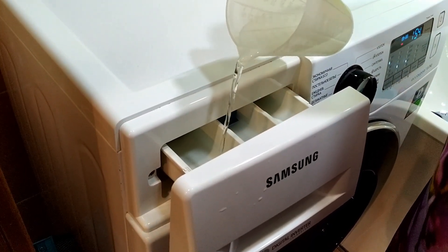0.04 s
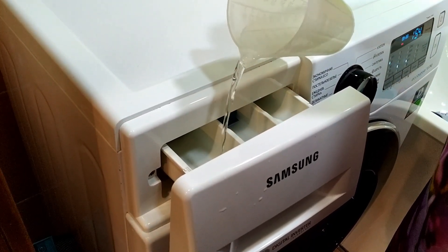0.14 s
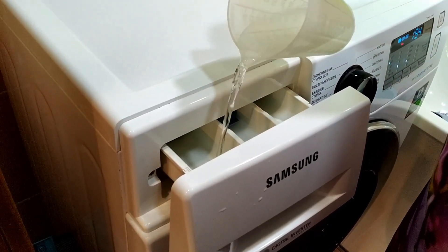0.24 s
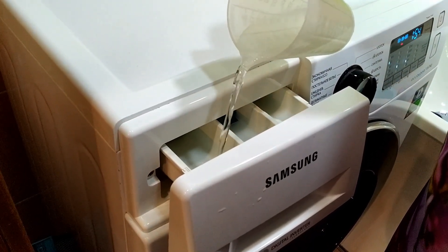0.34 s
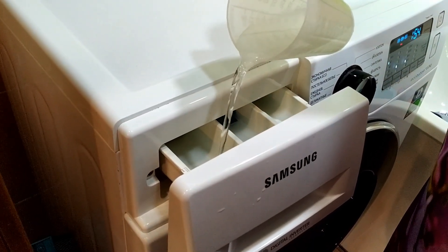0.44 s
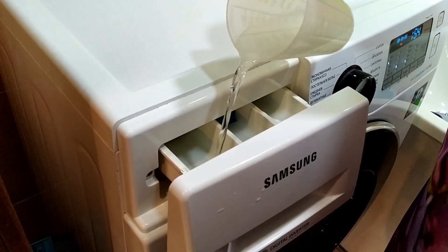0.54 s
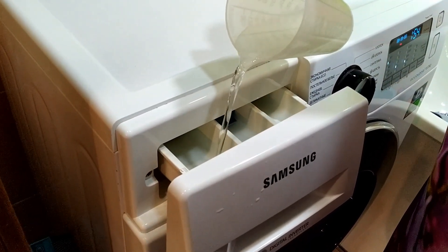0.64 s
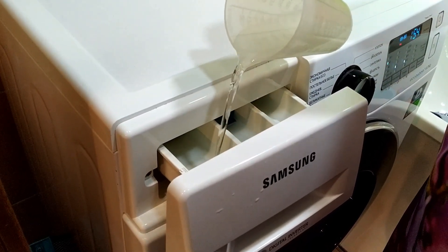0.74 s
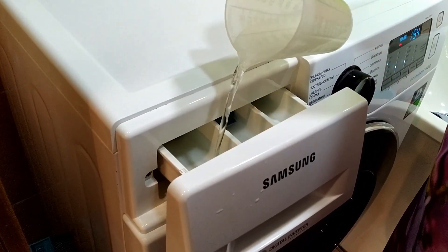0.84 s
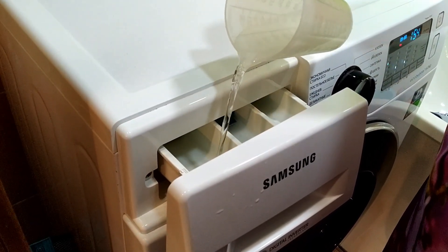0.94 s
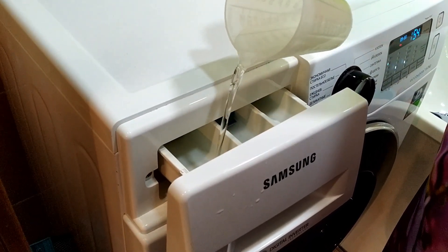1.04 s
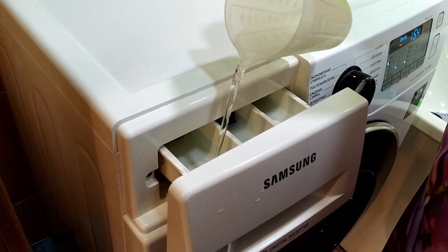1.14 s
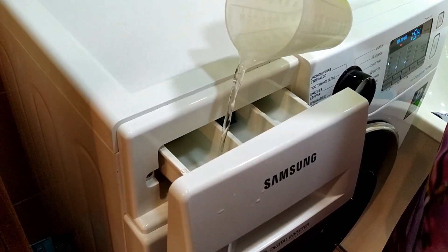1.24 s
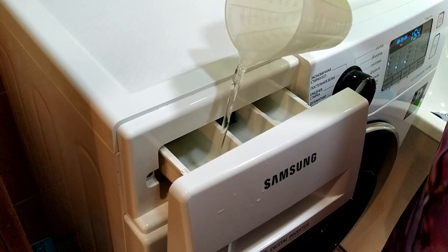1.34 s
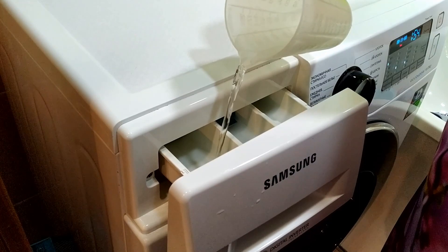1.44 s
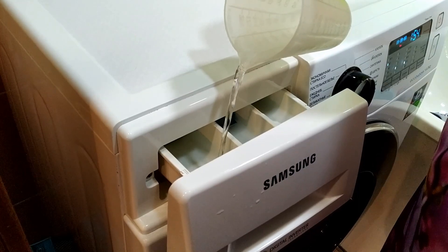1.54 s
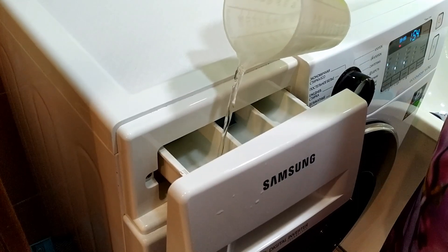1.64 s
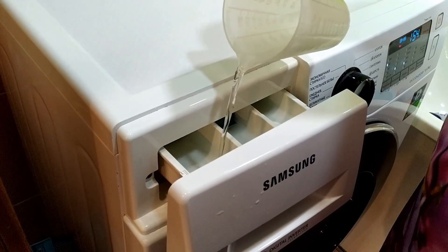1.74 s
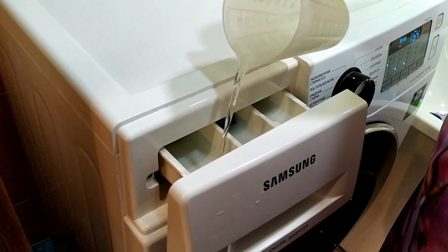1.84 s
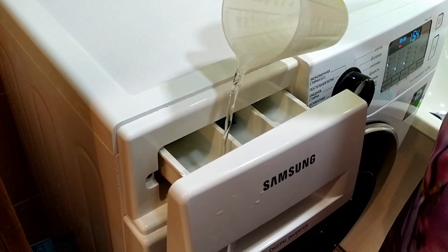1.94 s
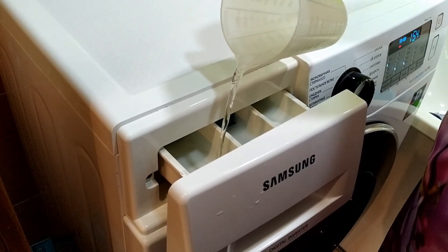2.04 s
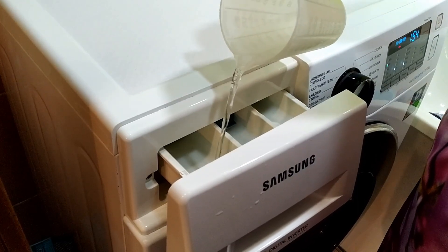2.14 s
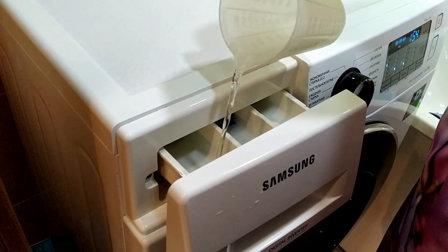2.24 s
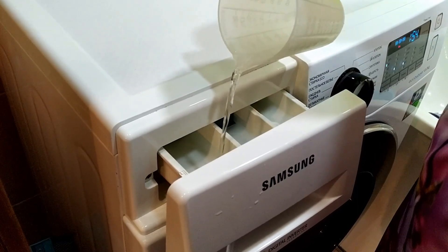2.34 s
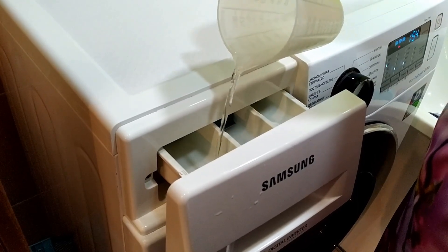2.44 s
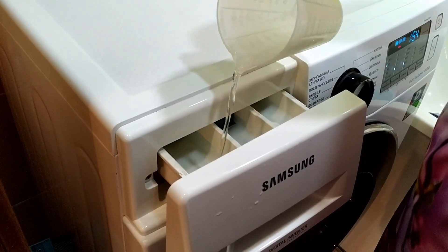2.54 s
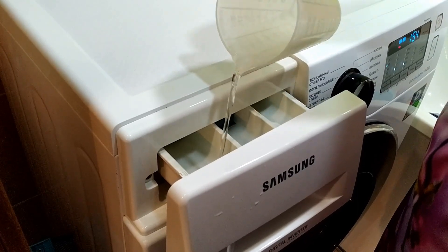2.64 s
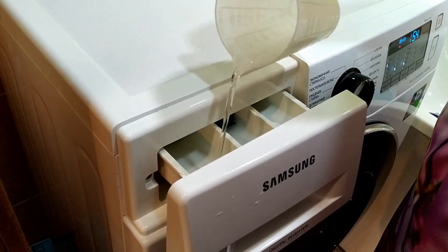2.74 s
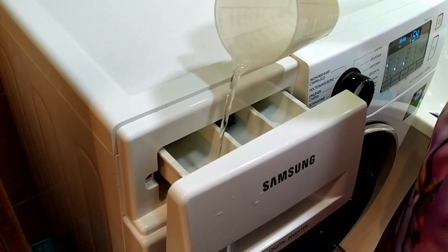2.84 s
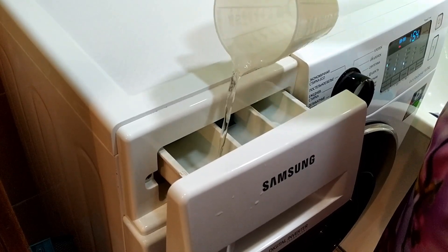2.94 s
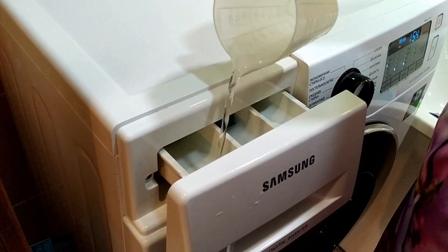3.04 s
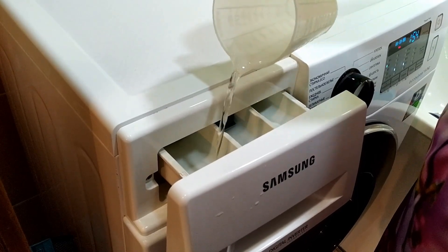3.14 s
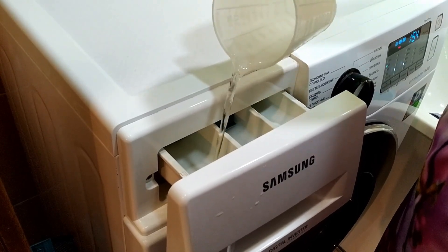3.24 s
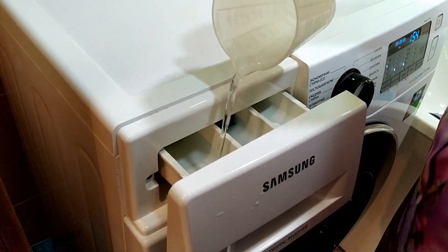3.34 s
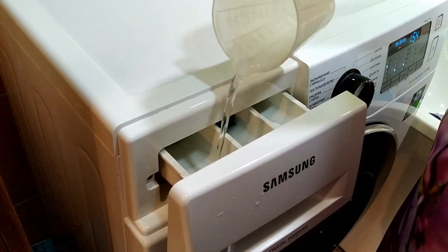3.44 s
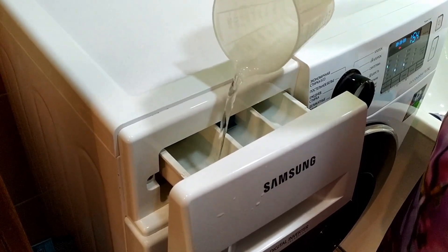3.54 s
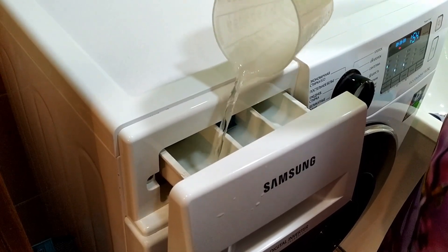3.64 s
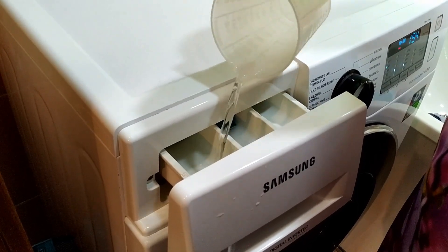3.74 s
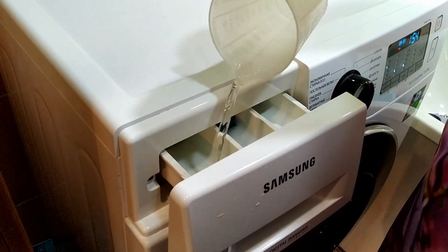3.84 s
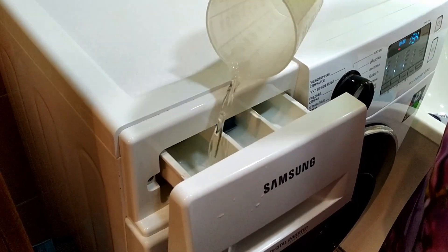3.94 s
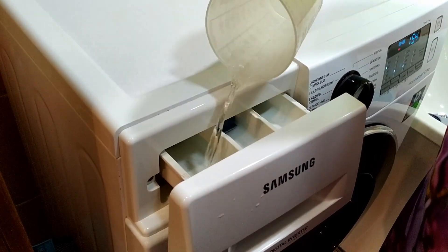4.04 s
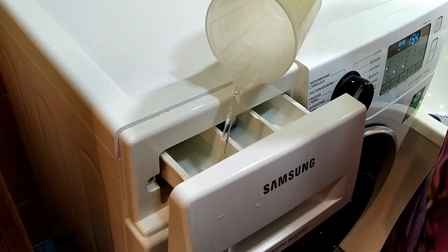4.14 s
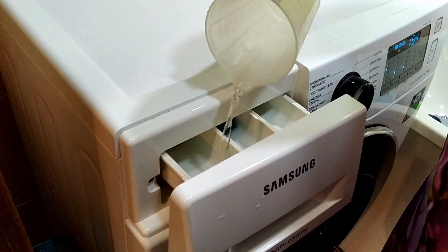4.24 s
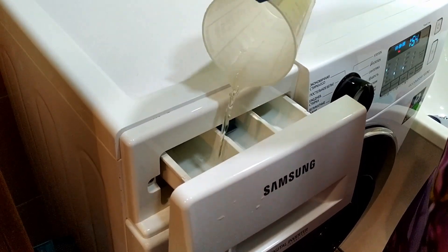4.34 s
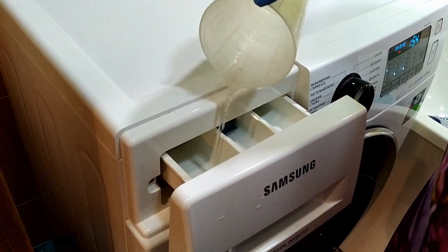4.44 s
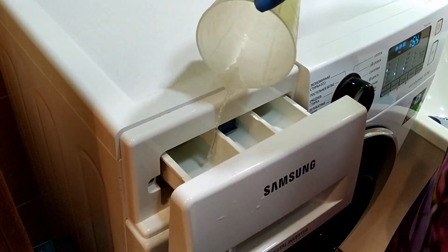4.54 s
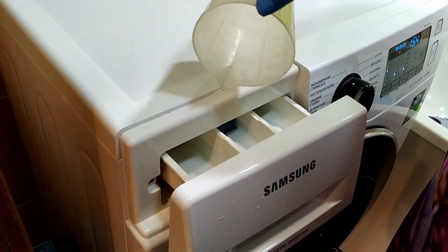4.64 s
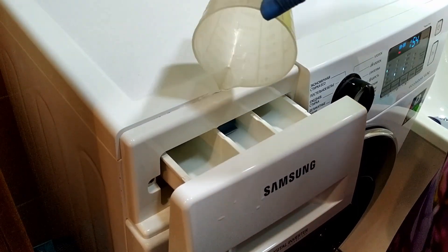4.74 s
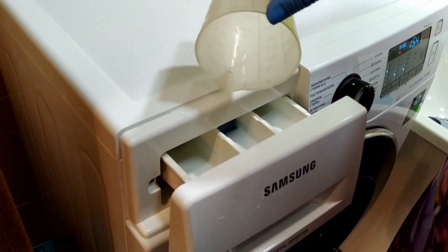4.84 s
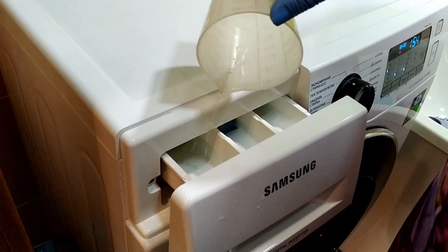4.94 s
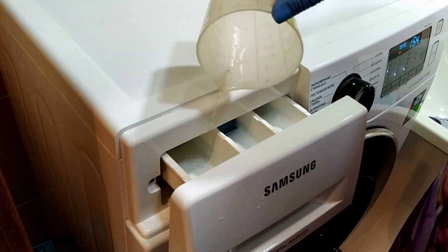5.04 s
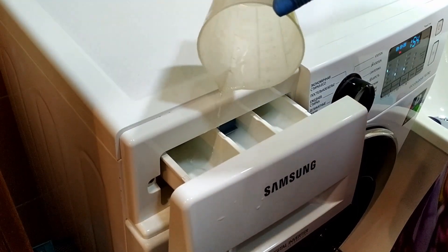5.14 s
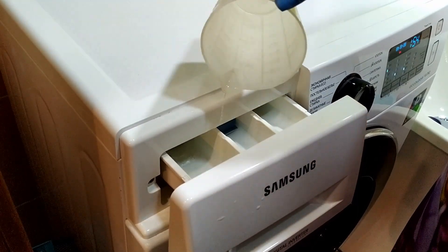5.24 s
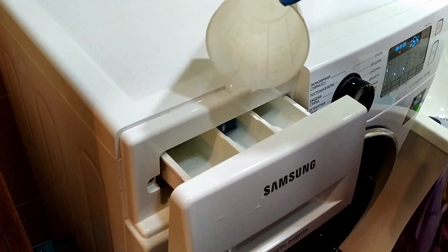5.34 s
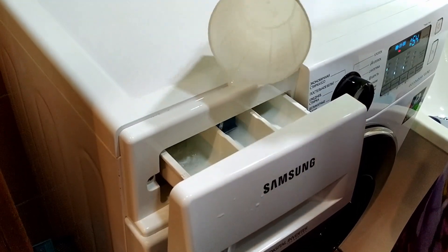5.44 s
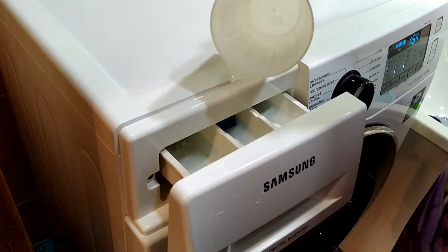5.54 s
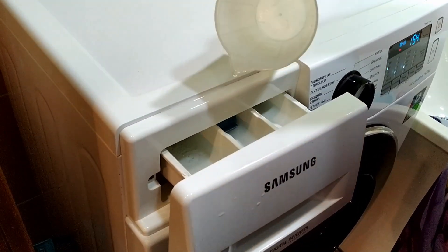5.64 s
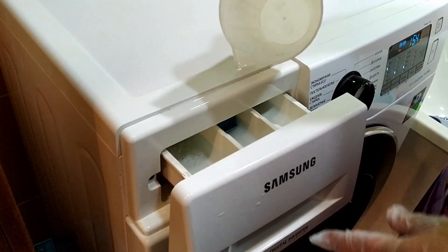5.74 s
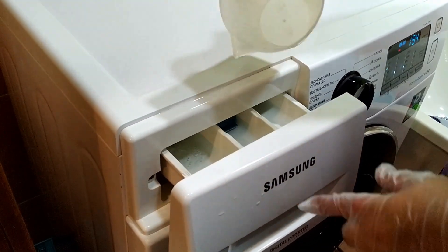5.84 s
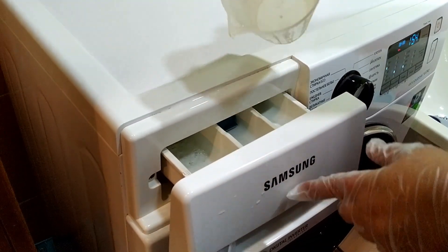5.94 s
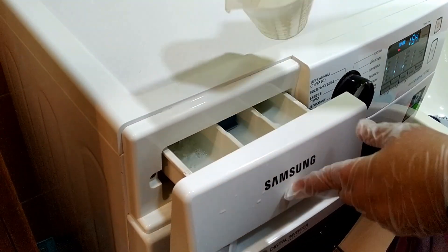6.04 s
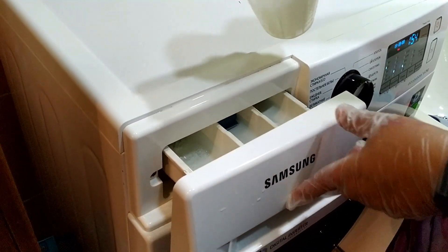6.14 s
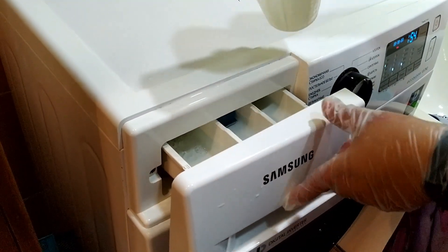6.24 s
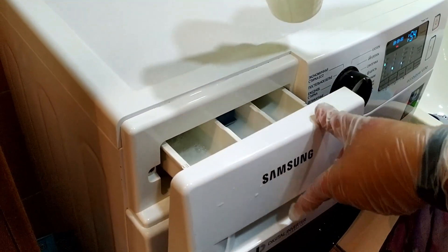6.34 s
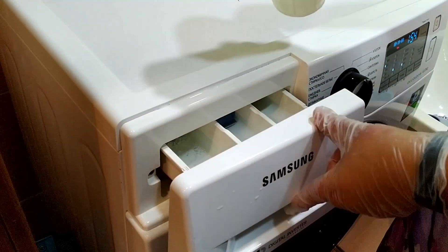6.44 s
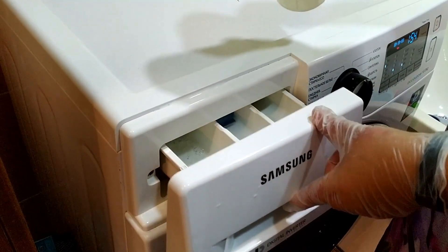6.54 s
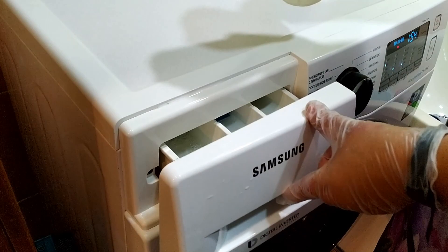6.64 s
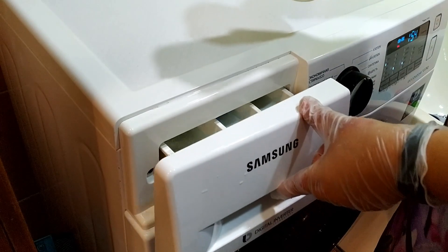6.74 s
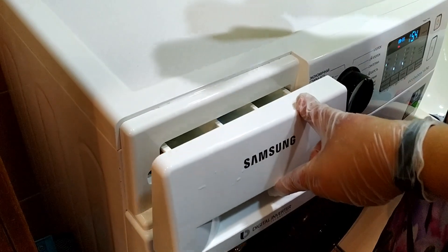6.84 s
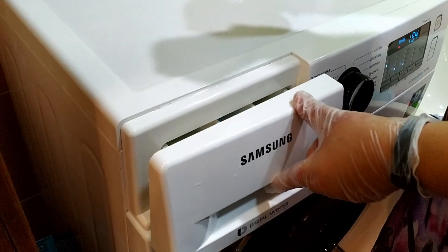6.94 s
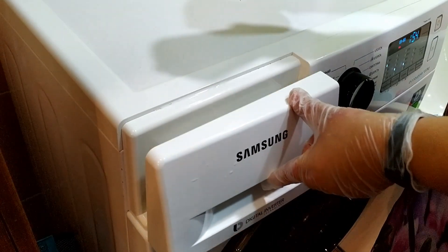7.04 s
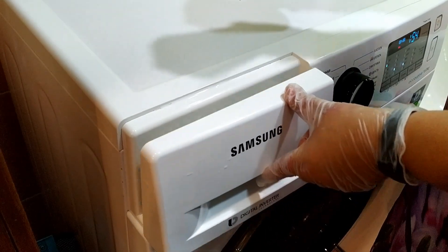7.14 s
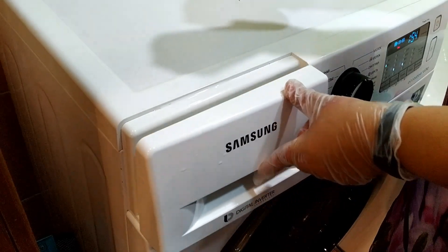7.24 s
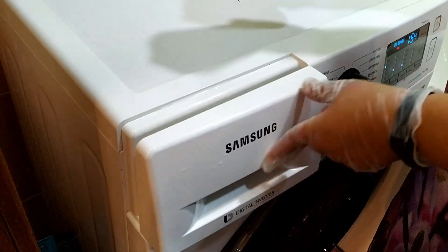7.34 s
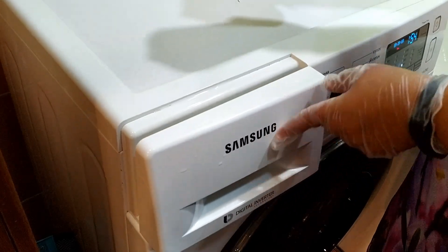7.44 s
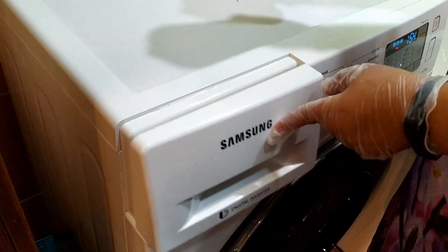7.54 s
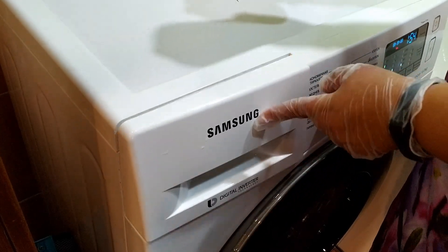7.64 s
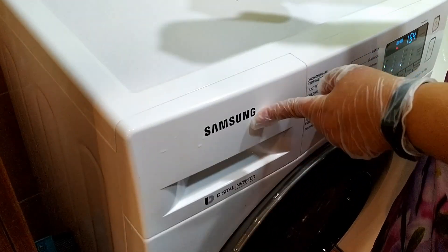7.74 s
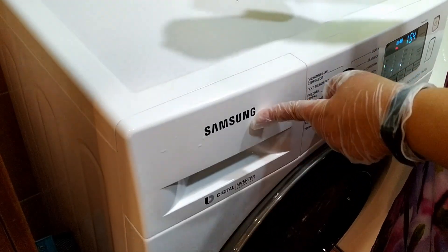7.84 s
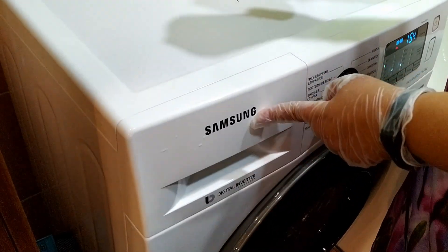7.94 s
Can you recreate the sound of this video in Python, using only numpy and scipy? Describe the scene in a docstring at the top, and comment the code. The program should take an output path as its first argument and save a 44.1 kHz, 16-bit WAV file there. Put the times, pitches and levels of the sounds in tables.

```python
"""Trickle into a detergent drawer

Liquid trickles from a jug into a washing machine's plastic drawer, in a small hard room with mains hum.
Bursting drops and bubbles are damped tones; after a bump, noise and dense grains drive the drawer's
resonances as a gritty rush. The drawer is then pushed home: thud, rattle and the snap of its catch ring
modes of cabinet and front plate. Two close ports hear it with unlike phase and colour.
"""
import sys
import numpy as np
from scipy import signal
from scipy.fft import rfft, irfft, next_fast_len
from scipy.io import wavfile
from scipy.ndimage import uniform_filter1d, map_coordinates

SR = 44100
rng = np.random.default_rng(int(sys.argv[2]) if len(sys.argv) > 2 else 0)


def wrap_up_sound(samples):
    """Save the sound to the file named by the first command line argument, as 16-bit audio."""
    columns = np.atleast_2d(samples).T
    # keep every value between -1 and 1, then stretch to whole-number steps
    tamed = np.clip(columns, -1, 1)
    steps = np.round(tamed * 32767).astype(np.int16)
    wavfile.write(sys.argv[1], SR, steps)


N = 352799
TIME = np.arange(N) / SR  # s


def amp(db):
    """Decibel law: the gain is 10 to the power dB / 20."""
    return np.exp(np.asarray(db) * (np.log(10) / 20))


def unit(x):
    """Normalisation: the signal scaled to rms 1."""
    return x / np.sqrt(np.mean(x ** 2) + 1e-20)


def along(points, hz):
    """Log-frequency interpolation of (f/Hz, value) points."""
    f, v = np.transpose(points)
    return np.interp(np.log(hz + 1), np.log(f + 1), v)


def curves(rows):
    """Linear interpolation in time: one envelope for each column after t/s."""
    s, *columns = np.transpose(rows)
    return [np.interp(TIME, s, column) for column in columns]


def wobble(rate):
    """Slow random modulation: a smooth curve through `rate` random knots a second."""
    coarse = np.arange(0, N + 32, 32)
    knots = rng.standard_normal(int(N * rate / SR) + 4)
    smooth = map_coordinates(knots, [coarse * rate / SR])
    return np.interp(np.arange(N), coarse, smooth)


def filtered(x, response):
    """Linear filtering: the spectrum times a complex frequency response."""
    m = next_fast_len(x.shape[-1] + SR // 4)
    spectrum = rfft(x, m) * response(np.fft.rfftfreq(m, 1 / SR))
    return irfft(spectrum, m)[..., :x.shape[-1]]


def shaped(x, points):
    """Spectral shaping by a (f/Hz, level/dB) curve."""
    return filtered(x, lambda hz: amp(along(points, hz)))


def resonances(modes):
    """Forced resonance: summed band-pass responses of alternating sign, from (f/Hz, width/Hz, level/dB)."""
    def response(f):
        total = 0
        for k, (centre, width, db) in enumerate(modes):
            damping = 1j * f * width
            total = total + (-1) ** k * amp(db) * damping / (centre * centre - f * f + damping)
        return total
    return response


def patchy(patchy_db, channels):
    """Non-stationary noise: white noise with patches of random gain in time and frequency."""
    z = signal.stft(rng.standard_normal((channels, N + 512)), nperseg=256)[2]
    field = rng.standard_normal(z.shape[1:])
    for axis in (0, 1):
        field = uniform_filter1d(field, size=5, axis=axis)
    return signal.istft(z * amp(patchy_db * unit(field)), nperseg=256)[1][:, :N]


def pings(s, db, hz, t60, rise=0., noisy=0., size=2048):
    """Damped oscillation: decaying tones; `rise` lifts their pitch, `noisy` lets their phase drift randomly."""
    t = np.arange(size) / SR
    s, db, hz, t60 = (np.reshape(v, (-1, 1)) for v in (s, db, hz, t60))
    jitter = noisy * np.cumsum(rng.standard_normal((len(s), size)), axis=1) if noisy else 0
    decay = amp(db - 60 * t / t60)
    onset = 1 - np.exp(-.3 * t * hz)
    wave = decay * onset * np.sin(2 * np.pi * hz * (t + rise * t * t / t60) + jitter)
    at = (s * SR).astype(int) + np.arange(size)
    return np.bincount(at.ravel(), wave.ravel(), N + SR)[:N]


def swarm(count, start, stop, centre_hz, spread, cycles, size_db):
    """Random superposition: short grains of log-normal pitch, a few much louder; rms 1 while they last."""
    u, z = rng.random((count, 2)), rng.standard_normal(count)
    hz = np.clip(centre_hz * np.exp(spread * z), 900, 13000)
    s = start + u[:, 0] * (stop - start)
    db = -size_db * np.log(u[:, 1] + 0.00057)
    grains = pings(s, db, hz, cycles / hz, rise=0.15, size=640)
    return unit(grains) * np.sqrt((stop - start) * SR / N)


# Bursting drops: t/s, level/dB, f/Hz
DROPS = [(0.554, -40.5, 9800), (0.99, -39, 6460), (1.298, -42.5, 11000), (1.3586, -38, 9750),
         (1.4207, -44.5, 5420), (1.4795, -46, 8300), (1.848, -43, 8130), (1.888, -45, 4860),
         (2.0422, -45, 6170), (2.2383, -39, 9700), (2.4279, -43, 9750), (2.6853, -43, 8040),
         (3.1178, -37, 8300), (3.4104, -38, 9700), (3.5478, -42, 10000), (3.7958, -49, 9960),
         (3.907, -34, 7700), (3.9878, -37, 11700), (4.0223, -41.5, 12060), (4.0825, -31.5, 10080),
         (4.1205, -48, 8300), (4.1474, -35.5, 12900), (4.208, -43, 8370), (4.2433, -42, 7060),
         (4.322, -40, 11600), (4.344, -37, 8260), (4.485, -43, 10500), (4.5291, -42, 7360),
         (4.6009, -49, 10000), (4.7705, -41.5, 11030), (4.9215, -33.5, 8820), (4.9631, -36, 9650)]
# Ringing air bubbles: t/s, level/dB, f/Hz
AIR_BUBBLES = [(0.0792, -45, 2580), (1.4212, -50, 2500), (1.4416, -48, 2160), (1.481, -51, 1480),
               (1.7544, -52.5, 2800), (1.8881, -52, 2520), (1.9744, -54, 2400), (2.187, -53, 1710),
               (2.2374, -44.5, 1680), (2.3196, -49, 1400), (2.365, -55, 2070), (2.4279, -45, 1390),
               (2.6838, -50, 1640), (2.813, -50, 1420), (2.977, -51, 1690), (3.1168, -43.5, 1644),
               (3.249, -42, 1720), (3.4092, -54, 1730), (3.5468, -55, 2130), (3.7944, -57, 1710),
               (3.8178, -45.5, 2560), (3.9115, -48, 3500), (3.9309, -42, 1580), (3.9893, -53, 2660),
               (4.0228, -49, 3260), (4.0652, -56, 2070), (4.0901, -47, 2280), (4.118, -48, 2370),
               (4.1774, -42, 1900), (4.238, -49, 2360), (4.27, -41.5, 1785), (4.36, -40, 1784),
               (4.4415, -46, 2920), (4.5338, -50, 1240), (4.56, -43.5, 1630), (4.6009, -48, 1720),
               (4.639, -46, 2890), (4.686, -41, 1395), (4.7204, -44, 2210), (4.7731, -43.5, 2070)]
# Sheets of spray: t/s, level/dB, 1/e length/s
SPRAY_SHEETS = [(1.418, -62, .04), (2.232, -57, 0.026), (2.415, -59, .04), (3.258, -61, 0.23),
                (3.402, -59.5, 0.02), (3.541, -49.5, 0.089), (3.905, -50.5, 0.016), (4.117, -52, 0.04),
                (4.246, -55, 0.11), (4.333, -57, 0.051), (4.439, -56.5, 0.049), (4.524, -57, 0.064),
                (4.593, -52.5, 0.1)]
# Relative spectrum of the sheets: f/Hz, level/dB
SHEET_SPECTRUM = [(590, -48), (1000, -21), (1700, -25), (2070, -4), (4120, -7), (4890, -5.5), (10100, 1),
                  (14000, -20), (15000, -37)]
# Faint patter of many small bubbles: t/s, level/dB
PATTER_LEVEL = [(0, -84), (1.9, -77), (2.3, -67.5), (2.9, -72), (3.3, -67), (4.0, -73.5), (4.2, -69),
                (4.6, -65.5), (4.9, -67.5)]
DROP_T60_S, SPIT_T60_S, SPIT_DB = 0.034, 0.0084, -13  # spit level relative to its drop
BUBBLE_T60_S, SNAP_T60_S = 0.036, 0.0074


def trickle():
    """Volume resonance of trapped air: bubbles ring as damped tones, among spitting drops and sheets of spray."""
    s, db, hz = np.transpose(DROPS)
    drops = pings(s, db, hz, DROP_T60_S, noisy=0.23)
    drops += pings(s, db + SPIT_DB, 0.99 * hz, SPIT_T60_S, noisy=0.93)

    s, db, hz = np.transpose(AIR_BUBBLES)
    bubbles = pings(s, db, hz, BUBBLE_T60_S, rise=0.04, noisy=0.15)
    bubbles += pings(s, db, 2 * hz, SNAP_T60_S, noisy=0.84, size=512)  # opening snap, an octave up

    sheets = 0
    for s, db, length in SPRAY_SHEETS:
        onset = np.clip((TIME - s) / 0.0023, 0, 1)
        sheets = sheets + amp(db) * onset * np.exp(-((TIME - s) / length) ** 2)
    spray = sheets * unit(shaped(patchy(3, channels=1)[0], SHEET_SPECTRUM))

    stop = PATTER_LEVEL[-1][0]
    patter = amp(curves(PATTER_LEVEL)[0]) * swarm(
        count=1200, start=0, stop=stop, centre_hz=1677, spread=0.334, cycles=19, size_db=3.5)
    spits = amp(-73.5) * swarm(
        count=600, start=0, stop=stop, centre_hz=8100, spread=0.227, cycles=40, size_db=0.5)
    return drops + bubbles + spray + patter + spits


# Course of the rush: t/s, level/dB, floor level/dB and walls level/dB relative to the fizz
RUSH_COURSE = [(4.93, -64, -3, -4), (4.97, -44, -31, -21), (5.01, -41, -2.5, -12), (5.08, -39.5, -19, -10),
               (5.19, -38, -4, -10), (5.53, -39, -11.5, -12.5), (5.59, -40, -2.5, -9),
               (5.78, -38, -22.5, -15.5), (6.62, -39, -10.5, -12), (7.25, -41.5, -21, -6.5),
               (7.39, -45, -6, -4.5), (7.52, -41, -15, -7.5), (7.64, -46, -22, -6)]
# Relative spectrum of its bright fizz: f/Hz, level/dB
FIZZ_SPECTRUM = [(590, -45), (1000, -9.5), (1400, -5.5), (2090, -7.5), (3040, -7.5), (3520, -9.5),
                 (3980, -3), (5230, -9.5), (5900, -9.5), (6500, -4), (7200, -5.5), (8200, -3), (9860, 0.5),
                 (11000, -5.5), (14200, -13), (14500, -75)]
# Resonances of spout, walls, floor and rails, one list each: f/Hz, width/Hz, relative level/dB
DRAWER_PARTS = [
    [(1745, 63, 4), (2087, 127, 6), (2415, 110, 3)],
    [(638, 91, 0.5), (808, 50, 7), (947, 100, 1)],
    [(402.5, 18.3, 0)],
    [(229, 150, -1), (310, 87, 5)],
]
# Loudest chirps of the gritty rush: t/s, level/dB, f/Hz
CHIRPS = [(5.0266, -17, 1390), (5.0561, -25, 1410), (5.1385, -21.5, 2160), (5.1817, -27, 4010),
          (5.2083, -28, 2170), (5.2567, -30, 2330), (5.342, -29, 1760), (5.4562, -25, 2140),
          (5.9092, -28, 2160), (5.9535, -24, 2340), (6.0718, -22, 2040), (6.112, -18.5, 2350),
          (6.1611, -21.5, 7810), (6.212, -33, 2230), (6.2391, -21.5, 2000), (6.2833, -23, 2350),
          (6.3166, -23, 2050), (6.3546, -24, 1700), (6.4075, -25, 2340), (6.492, -24, 2220),
          (6.5333, -22, 2180), (6.5778, -32, 2330), (6.6275, -21, 2210), (6.6734, -25, 2240),
          (6.862, -25, 1750), (7.0152, -26, 1980), (7.0573, -38, 2360), (7.1459, -25, 1697),
          (7.19, -26, 2425), (7.238, -23.5, 2380)]
# Loudest bright ticks: t/s, level/dB, f/Hz
BRIGHT_TICKS = [(4.9649, -38, 9810), (5.0851, -28, 9370), (5.2068, -29, 8400), (5.2367, -25, 9400),
                (5.5904, -21.5, 9910), (5.766, -25, 9880), (5.9117, -22.5, 9370), (6.0289, -22.5, 9430),
                (6.1118, -22.5, 10300), (6.5328, -26, 9900), (6.6231, -29, 9700), (6.7388, -24, 9900),
                (7.2078, -26.5, 9580), (7.347, -27, 10000), (7.4103, -27, 9940), (7.4826, -25, 10270),
                (7.5121, -21.5, 9900), (7.5924, -26.5, 9800)]
SPOUT_DB, RAILS_DB, WANDER_DB = -7, -9.5, 2  # mean levels relative to the fizz; random wander of every part
CHIRP_T60_S, TICK_T60_S = 0.026, 0.018


def rush():
    """Forced vibration: noise and grains drive the drawer's parts, under a wide fizz unlike at the two ports."""
    level_db, floor_db, walls_db = curves(RUSH_COURSE)
    start, stop = RUSH_COURSE[0][0], RUSH_COURSE[-1][0]
    on = np.clip((TIME - start) / 0.024, 0, 1) * np.clip((stop + 0.12 - TIME) / 0.037, 0, 1)

    flutter = amp(.8 * wobble(20) + 1.1 * wobble(80))
    grit = patchy(3.2, channels=2)
    grit = grit + 0.42 * swarm(
        count=1800, start=start, stop=stop, centre_hz=6137, spread=0.46, cycles=30.6, size_db=2.0)
    mix = unit(shaped(grit * flutter, FIZZ_SPECTRUM))

    short_grains = swarm(count=1100, start=start, stop=stop, centre_hz=2106, spread=0.21, cycles=10, size_db=2.5)
    long_grains = swarm(count=700, start=start, stop=stop, centre_hz=2502, spread=0.35, cycles=76, size_db=2.5)
    mix += amp(-11) * long_grains + amp(-14.5) * short_grains

    # short grains drive the spout; fluttering noise drives the other parts
    drives = [short_grains + 0.2 * rng.standard_normal(N)]
    drives += [rng.standard_normal(N) * amp(1.3 * wobble(60)) for _ in DRAWER_PARTS[1:]]
    for modes, db, drive in zip(DRAWER_PARTS, (SPOUT_DB, walls_db, floor_db, RAILS_DB), drives):
        part = unit(filtered(drive * on, resonances(modes))) * np.sqrt(on.mean())
        mix += amp(db + WANDER_DB * wobble(9)) * part

    chirps = pings(*np.transpose(CHIRPS), CHIRP_T60_S, rise=0.044, noisy=0.12, size=1024)
    ticks = pings(*np.transpose(BRIGHT_TICKS), TICK_T60_S, noisy=0.24, size=1024)
    return on * amp(level_db) * mix + chirps + ticks


# Cabinet modes: f/Hz, relative level/dB, t60/s
CABINET_MODES = [(124.2, -4, 0.46), (166, -10, 0.15), (197, -18.5, 0.28), (232.2, -5.5, 0.17),
                 (299.4, -3.5, 0.12), (388, -13, 0.21), (521, -19, 0.054), (647, -14.5, 0.076)]
# Modes of the drawer's front plate: f/Hz, relative level/dB, t60/s
FRONT_MODES = [(772, -5.5, 0.074), (903, -1.5, 0.19), (1042, 5.5, 0.037), (1177, -2, 0.24),
               (1385, -0.5, 0.072), (1820, -6, .04), (2070, 2, 0.069), (2500, -20, 0.055),
               (3410, 0.5, 0.027), (7720, 6, 0.02)]
# Relative spectrum of the crack: f/Hz, level/dB
CRACK_SPECTRUM = [(290, -50), (500, -10), (1050, -3.5), (1680, -8), (1990, -3), (2230, -7.5), (3410, -9),
                  (3990, -14), (10200, -8.5), (14200, -30.5), (15000, -52)]
# Contacts: t/s, cabinet level/dB, front level/dB, crack level/dB, rise time/s
CONTACTS = [(4.895, -34, -55, -60, 0.0051), (4.999, -32.5, -46, -50, 0.0012), (6.66, -36, -70, -66, 0.006),
            (7.618, -23, -53, -33.5, 0.012), (7.646, -26.5, -44, -23.5, 0.0067),
            (7.661, -50, -42, -34, 0.004), (7.682, -15, -46, -31, 0.0026), (7.693, -18.5, -40, -26, 0.0006),
            (7.699, -13, -18.5, -18, 0.0011), (7.712, -21, -28.5, -21.5, 0.0002),
            (7.731, -17.5, -46, -50, 0.001), (7.79, -24.5, -22, -15, 0.00016),
            (7.808, -21, -39, -32, 0.0017), (7.85, -21, -45, -32.5, 0.0023)]


def ring(modes, blur, t):
    """Modal superposition: decaying modes at random strengths, their phases blurred by loose parts."""
    total = 0
    for hz, db, t60 in modes:
        strength_db = db + rng.normal(0, 2.3)
        drift = np.cumsum(rng.standard_normal(len(t))) / np.sqrt(SR)
        total = total + amp(strength_db - 60 * t / t60) * np.sin(2 * np.pi * hz * t + blur * drift)
    return total


def knocks():
    """Impact excitation: contacts ring cabinet and front plate and rattle; slower rises give duller cracks."""
    out, t = np.zeros((2, N + SR)), np.arange(SR // 3) / SR
    for s, cabinet_db, front_db, crack_db, rise in CONTACTS:
        shared, own = rng.standard_normal(len(t)), rng.standard_normal((2, len(t)))
        dulled = lambda hz: amp(along(CRACK_SPECTRUM, hz)) / np.hypot(1, 0.11 * hz * rise)
        rattle = unit(filtered(shared + 1.36 * own, dulled))
        crack = rattle * (amp(-60 * t / 0.061) + amp(-8.5 - 60 * t / 0.29))  # fast decay, then a slow one
        blow = amp(cabinet_db) * ring(CABINET_MODES, 5.5, t)
        blow = blow + amp(front_db) * ring(FRONT_MODES, 17.2, t) + amp(crack_db) * crack
        first = round(s * SR)
        out[:, first:first + len(t)] += (1 - np.exp(-t / rise)) * blow
    # second-order high-pass at 45 Hz: takes the low thump off the abrupt starts of the tones
    return filtered(out[:, :N], lambda hz: (1j * hz / (45 + 1j * hz)) ** 2)


# Phase between the ports for near sound: f/Hz, left minus right/rad
PORT_PHASE = [(60, -.12), (150, -.15), (300, -.35), (700, -.9), (1500, -1.3), (14000, -1.5)]


def ports(x):
    """Inter-channel phase difference: a near source reaches the two ports with unlike phase."""
    half = lambda hz: np.exp(.5j * along(PORT_PHASE, hz))
    return filtered(x, lambda hz: np.array([half(hz), 1 / half(hz)]))


# Reverberation time: f/Hz, t60/s
ROOM_DECAY = [(100, 1), (1000, 0.19), (10000, 0.19)]


def room(x):
    """Diffuse reverberation: each frequency decays at its own speed; the small room has no bass tail."""
    hz, t, z = signal.stft(rng.standard_normal((2, SR // 3)), SR, nperseg=256)
    diffuse = np.clip(hz / 700 - .3, 0, 1)[:, None]  # none below 210 Hz, full from 910 Hz
    decay = amp(-60 * t / along(ROOM_DECAY, hz)[:, None])
    tail = signal.istft(z * diffuse * decay, SR, nperseg=256)[1]
    tail = tail / np.linalg.norm(tail[0])
    delayed = np.pad(x, (150, 0))[None]  # delay in samples
    return signal.fftconvolve(delayed, tail, axes=1)[:, :N]


# Brief swells of a low drone: t/s, level/dB, 1/e half length/s
DRONE_SWELLS = [(1.615, -59.5, 0.062), (3.108, -55.5, 0.068), (4.935, -39, 0.024), (6.766, -41.5, 0.14),
                (7.26, -54, 0.24)]


def drone():
    """Narrow-band resonance: noise through one low mode, swelling and fading."""
    swell = sum(amp(db) * np.exp(-((TIME - s) / length) ** 2) for s, db, length in DRONE_SWELLS)
    return swell * unit(filtered(rng.standard_normal(N), resonances([(139.5, 12.4, 0)])))


# Hum tones: f/Hz, mean level/dB rms
HUM_TONES = [(99.7, -53.5), (49.7, -67), (272.5, -70), (373, -78.5)]
# Relative spectrum of the low murmur of machines: f/Hz, level/dB
MURMUR_SPECTRUM = [(6, -48), (14, 9), (21, -2), (30, -4), (48, -8), (70, -17), (125, -14.5), (245, -24),
                   (281, -19.5), (400, -27.5), (560, -28), (800, -33), (1500, -51), (3300, -120)]
# Its course: t/s, level/dB
MURMUR_LEVEL = [(0, -52), (2.4, -51.5), (3.6, -51.5), (4.4, -50), (6.3, -48), (7.3, -50), (8, -38)]
# Relative spectrum of the steady background hiss: f/Hz, level/dB
HISS_SPECTRUM = [(500, -17), (900, -10), (1500, -12), (3700, -11.5), (5800, -11.5), (7600, -6),
                 (8800, -6.5), (9900, 0), (11000, -7.5), (12500, -12), (14000, -12), (15000, -30)]
# Its course: t/s, level/dB
HISS_LEVEL = [(0, -59.5), (3.5, -60), (4.2, -58), (4.6, -62.5), (4.9, -57), (8, -57)]
# Left-right likeness of distant sound: f/Hz, correlation
LIKENESS = [(60, 0.88), (180, 0.81), (540, 0.53), (1630, -0.15), (4890, -0.047), (14700, -0.029)]


def background():
    """Partial coherence: murmur and hiss agree at both ports only in the bass; the hum is common."""
    out = 0
    for hz, db in HUM_TONES:
        level = np.sqrt(2) * amp(db + 1.3 * wobble(4.06))
        out = out + level * np.sin(2 * np.pi * hz * TIME + 0.41 * wobble(4.9))

    def mid_side(hz, spectrum):
        angle = np.arccos(np.clip(along(LIKENESS, hz), -1, 1)) / 2
        return amp(along(spectrum, hz)) * [np.cos(angle), np.sin(angle)]

    layers = ((MURMUR_SPECTRUM, MURMUR_LEVEL, .8), (HISS_SPECTRUM, HISS_LEVEL, 1.8))
    for spectrum, level, patchy_db in layers:
        mid, side = filtered(patchy(patchy_db, channels=2), lambda hz: mid_side(hz, spectrum))
        out = out + amp(curves(level)[0]) * unit(np.array([mid + side, mid - side]))
    return out


def scene():
    """Superposition: near sources directly at the ports and by way of the room, over the background."""
    near, blows = trickle() + rush(), knocks()
    sent_to_room = amp(-5.5) * near[0] + amp(-7) * blows[0]
    return ports(near + blows) + room(sent_to_room) + background() + drone()


# Unlike colour of the two ports: f/Hz, left minus right level/dB
PORT_COLOUR = [(60, 0.5), (99, -1.0), (160, 0.5), (270, 0), (440, 0), (730, 0.5), (1210, -2), (1990, -5.5),
               (3280, -1.5), (5400, -3), (8900, 2.5), (14700, 6.5)]
# Brief dip of the whole level: from t/s, to t/s
LEVEL_DIP = (4.056, 4.065)
TOP_HZ = 14350


def record(dry):
    """Saturation and band limiting: port colour, soft overload of loud peaks, a brief dip, a sharp low-pass."""
    tilt = np.array([[1], [-1]])
    coloured = filtered(dry, lambda hz: amp(along(PORT_COLOUR, hz) / 2 * tilt))
    soft = coloured / (1 + np.abs(coloured / .95) ** 8) ** .125
    outside = np.maximum(LEVEL_DIP[0] - TIME, TIME - LEVEL_DIP[1])
    dip = np.clip(outside / .002, .2, 1)  # down to a fifth, with short ramps
    return filtered(soft * dip, lambda hz: hz < TOP_HZ)


dry = scene()
out = record(dry)
wrap_up_sound(out)
```